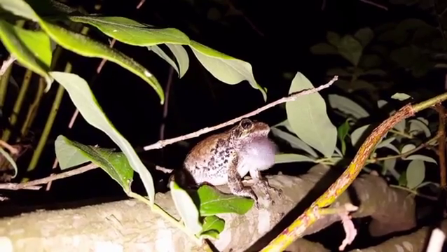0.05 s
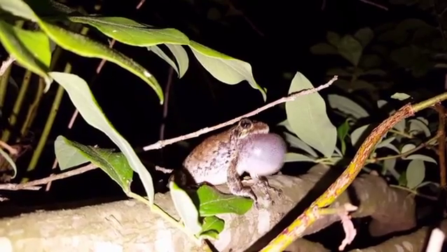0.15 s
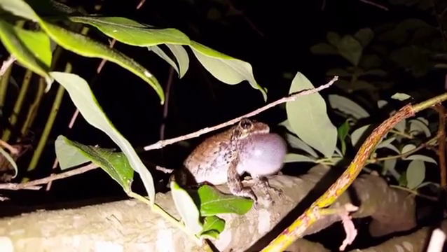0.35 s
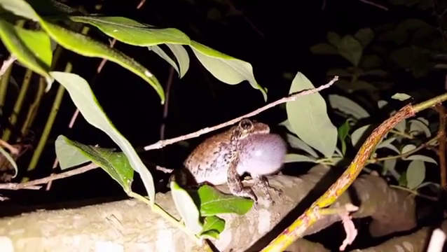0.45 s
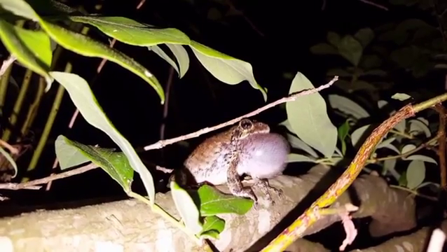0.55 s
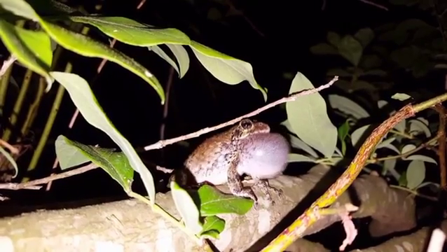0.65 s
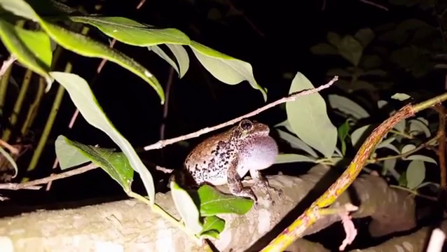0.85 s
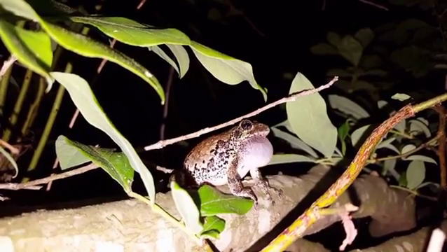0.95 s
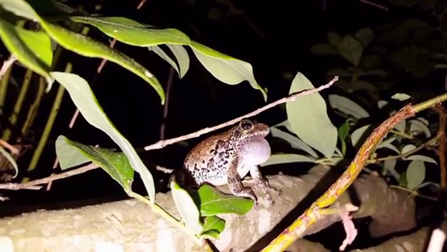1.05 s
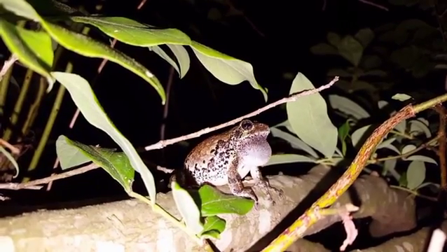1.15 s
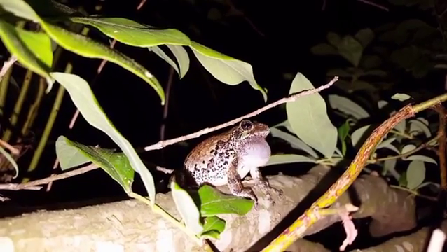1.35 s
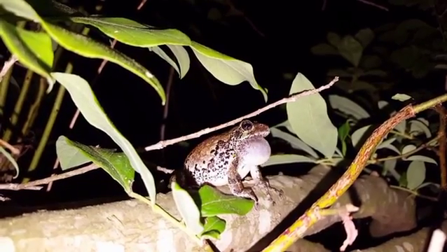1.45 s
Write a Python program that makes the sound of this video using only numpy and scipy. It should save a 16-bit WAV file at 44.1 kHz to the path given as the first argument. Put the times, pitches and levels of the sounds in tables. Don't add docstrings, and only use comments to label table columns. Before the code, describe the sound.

A tree frog's loud, close trill dominates from about 0.2 to 0.9 seconds: thirteen short, throaty, whistled pulses, roughly nineteen per second, each gliding upward around 2 kHz, with tiny leaf echoes. From 0.53 to 1.2 seconds a quieter frog trills on the right, slightly lower. Faint far frogs echo around a pond throughout, one joining near 0.95, over low rumble, hiss and a thin insect tone.

```python
import sys
import numpy as np
from scipy import signal
from scipy.fft import rfft, irfft
from scipy.io import wavfile

SR = 44100
rng = np.random.default_rng(int(sys.argv[2]) if len(sys.argv) > 2 else 0)


def field_ratio(decibels):
    return 10 ** (np.asarray(decibels, dtype=float) / 20)


def persist_wave(psi):
    counts = np.round(np.clip(psi, -1, 1) * 32767).astype(np.int16)
    wavfile.write(sys.argv[1], SR, np.atleast_2d(counts).T)


N = 66150
T = np.arange(N) / SR
LEFT_RIGHT = np.array([[.5], [-.5]])
MIDDLE_HZ = 999.5
WOBBLE_HZ = 220
POND_T60_S = 0.44


def read(points, hz):
    p = np.array(points)
    return np.interp(np.log(hz), np.log(p[:, 0]), p[:, 1])


def band(x, lo_hz, hi_hz):
    sos = signal.butter(2, [lo_hz, hi_hz], "band", fs=SR, output="sos")
    y = signal.sosfilt(sos, x)
    return y / np.sqrt(np.mean(y ** 2))


def walk(hz):
    return band(rng.standard_normal(N), hz / 4, hz)


def step(x):
    return np.sin(np.pi / 2 * np.clip(x, 0, 1)) ** 2


def scatter(x, t60_s, lag_s):
    t = T[:int(SR / 2)]
    tail = rng.standard_normal((2, len(t))) * field_ratio(-60 * t / t60_s) * step(t / lag_s)
    tail = tail / np.sqrt(np.sum(tail ** 2, axis=1, keepdims=True))
    return signal.fftconvolve(x[None], tail, axes=1)[:, :N]


def larynx(times, middle_hz, before_s, after_s):
    glide_hz_per_s, top_hz, pitch_jitter = 9200, 1155, .003
    attack_s, release_s = .0046, .0032
    k = np.searchsorted(times[1:] - before_s, T)
    u = T - times[k]
    glide = np.clip(1 + u * glide_hz_per_s / MIDDLE_HZ, .75, top_hz / MIDDLE_HZ)
    hz = glide * middle_hz * (1 + pitch_jitter * walk(300))
    phase = 2 * np.pi * np.cumsum(hz) / SR
    gate = step((u + before_s) / attack_s) * step((after_s[k] - u) / release_s)
    return k, u, hz, phase, gate


def far_frog(first_s, last_s, period_s, middle_hz, sac, before_s, after_s):
    beats = np.arange(40)
    chance = rng.standard_normal((len(beats), 2))
    times = first_s + period_s * beats + .0008 * chance[:, 0]
    k, u, hz, phase, gate = larynx(times, middle_hz, before_s, after_s + 0 * times)
    db = 1.2 * chance[k, 1] + 2.26 * walk(WOBBLE_HZ)
    partials = sum(field_ratio(db + read(sac, n * hz)) * np.sin(n * phase) for n in range(1, 5))
    return (times[k] < last_s) * gate * partials


def night():
    # [hz, db per Hz]
    rumble = [(25, -9), (60, -1), (130, -5), (200, -2), (350, -5), (500, -13), (1200, -24), (5000, -70)]
    rumble_db, hiss_db, hiss_hz = -70, -70, 2500
    insect_hz, insect_db = 3450, -88.5
    hz = np.maximum(np.arange(N // 2 + 1) * SR / N, 25)
    noise = rng.standard_normal(N) + 0.89 * rng.standard_normal((2, N))
    low = irfft(rfft(noise) * field_ratio(read(rumble, hz)), N) * field_ratio(2 * walk(6))
    hiss = irfft(rfft(rng.standard_normal((2, N))) / (1 + (hz / hiss_hz) ** 2.2), N)
    insect = band(noise, insect_hz - 120, insect_hz + 120) * field_ratio(2.6 * walk(30))
    low = field_ratio(rumble_db) * low / low.std()
    hiss = field_ratio(hiss_db) * hiss / hiss.std()
    return low + hiss + field_ratio(insect_db) * insect


def far_chorus():
    # [first_s, last_s, period_s, middle_hz]
    trills = [
        (-.03, 1.5, .043, 1000),
        (-.02, 1.3, .048, 960),
        (.0, 1.5, .056, 1020),
        (-.04, 1.5, .046, 975),
    ]
    # [first_s, last_s, period_s, middle_hz]
    late_trill = (.949, 1.5, .052, 1000)
    # [hz, level_db]
    far_sac = [(850, -11), (1020, -4), (1200, -12), (1750, -10), (2030, 7), (2300, -12), (2900, -24),
               (3800, -34)]
    chorus_db, late_db, pond_db, pan_db = -56, -50, 1.5, -2.5
    chorus = field_ratio(chorus_db) * sum(far_frog(*row, far_sac, .015, .017) for row in trills)
    chorus = chorus + field_ratio(late_db) * far_frog(*late_trill, far_sac, .011, .012)
    direct = np.array([np.roll(chorus, 9), chorus])
    return (direct + field_ratio(pond_db) * scatter(chorus, POND_T60_S, .02)) * field_ratio(pan_db * LEFT_RIGHT)


def tree_frog():
    # [middle_s, level_db, lapse_after_middle_ms, lapse_db, level_after_lapse_db]
    pulses = [(.2175, -5, 8, 0, -11), (.269, -1.2, 9.5, -1, -14), (.319, -2.5, 6, -1, -11),
              (.3725, -4, 6.5, -9, -1), (.425, -3.5, 2, -8, -2.5), (.479, -5, 9, -9, 1),
              (.5365, -3, 7, -1, -14), (.590, -6, 8.5, -8, -3), (.6455, -4, 8, -1, -13),
              (.701, -3.5, 14.5, -1, -6), (.755, -3.5, 15, -1, -10), (.810, -5, 7, -6, -7),
              (.8655, -4, 8, -1, -17)]
    # [level_db, loudest_hz, 6_db_down_below_hz, 6_db_down_above_hz]
    sac_partials = [(-15.5, 1090, 190, 200), (.5, 1038, 70, 135), (-27, 1040, 110, 150),
                    (-40, 1010, 80, 80), (-52, 1010, 80, 80)]
    # [left_minus_right_db, left_lead_rad]
    ports = [(1.5, 0.73), (-0.9, 0.77), (-1, 2.1), (1, 1.5)]
    before_s, after_s, linger_s_per_db = .017, .017, .0006
    lapse_s, fade_db_per_s, onset_wobble_db = .002, 1100, 6
    first_share = 0.52
    slack_db, slack_s, slack_widen = 6, .09, .6
    rasp_hz, rasp_width_hz, rasp_db, rasp_pan_db = 7800, 700, -48, -2
    air_db, hiss_db, croak_db = -52, -58, -30

    rows = np.array(pulses)
    linger_s = after_s - linger_s_per_db * rows[:, 4]
    k, u, hz, phase, gate = larynx(rows[:, 0], MIDDLE_HZ, before_s, linger_s)
    pulse_db = rows[k, 1]
    late = (u - rows[k, 2] / 1000) / lapse_s
    effort_db = rows[k, 3] * np.exp(-late ** 2) + rows[k, 4] * step(late / 3 + .5)
    drift_db = onset_wobble_db * step((-u - .005) / .006) * np.tanh(walk(130) - .4)
    drift_db = drift_db - fade_db_per_s * np.maximum(u - .013, 0)
    slack = np.exp(-np.abs(T - rows[0, 0]) / slack_s)

    voice = 0
    for n, (top_db, top_hz, below_hz, above_hz) in enumerate(sac_partials, 1):
        lr_db, lead = ports[min(n, len(ports)) - 1]
        width_hz = np.where(hz < top_hz, below_hz * (1 + slack_widen * slack), above_hz)
        off = (hz - top_hz) / width_hz
        db = top_db - 15 * (np.sqrt(1 + .96 * off ** 2) - 1) + pulse_db + drift_db
        db += (.4 if n < 3 else 3.5) * walk(WOBBLE_HZ)
        db += (first_share if n == 1 else 1) * effort_db
        if n != 2:
            db += slack_db * slack
        voice = voice + field_ratio(db + lr_db * LEFT_RIGHT) * np.sin(n * phase + lead * LEFT_RIGHT)

    push_db = pulse_db + .5 * effort_db + drift_db - 6 * (u / .014) ** 2 + 3 * walk(90)
    push = field_ratio(push_db) * (1 + 0.59 * np.sin(phase))
    noise = rng.standard_normal(N) + 1.1 * rng.standard_normal((2, N))
    rasp = band(noise, rasp_hz - rasp_width_hz / 2, rasp_hz + rasp_width_hz / 2)
    rasp = field_ratio(rasp_db + rasp_pan_db * LEFT_RIGHT) * rasp
    rasp = rasp + field_ratio(air_db) * band(noise, 2600, 6000) + field_ratio(hiss_db) * band(noise, 12000, 13000)
    croak = field_ratio(croak_db + slack_db * slack + pulse_db - 6 * ((u + .012) / .005) ** 2)
    croak = croak * band(rng.standard_normal(N), 950, 2200)
    return (voice + rasp * push + croak) * gate


def leaves(frog):
    return field_ratio(-17) * scatter(frog.mean(0), .06, .005)


def neighbour():
    # [first_s, last_s, period_s, middle_hz]
    trill = (.5308, 1.2, .0469, 900)
    # [hz, level_db]
    neighbour_sac = [(850, -17), (1000, -13), (1650, -9), (1780, 0), (1950, -7), (2100, -18), (2850, -20),
                     (3600, -38)]
    level_db, pan_db, lag_samples, wet_db = -36, -10, 12, -14
    frog = field_ratio(level_db) * far_frog(*trill, neighbour_sac, .008, .011)
    direct = np.array([np.roll(frog, lag_samples), frog]) * field_ratio(pan_db * LEFT_RIGHT)
    return direct + field_ratio(wet_db) * scatter(frog, POND_T60_S, .01)


def scene():
    duck_db, night_duck_db, duck_from_s, duck_s, late_db_per_s = 3.5, 4, 0.24, .08, -4.5
    wide = np.exp(-np.maximum(T - duck_from_s, 0) / duck_s)
    gain_db = duck_db * wide + late_db_per_s * (T - 1.3)
    background = field_ratio(gain_db) * (far_chorus() + field_ratio(night_duck_db * wide) * night())
    frog = tree_frog()
    return frog + leaves(frog) + neighbour() + background


def band_limit(x):
    return signal.sosfilt(signal.butter(12, 15670, fs=SR, output="sos"), x)


def record(dry):
    # [left_db, right_db]
    lopsided_db = [-42, -29]
    clip = 1.02
    soft = dry / (1 + np.abs(dry / clip) ** 8) ** (1 / 8)
    mix = soft + field_ratio(np.array(lopsided_db))[:, None] * soft ** 8
    return band_limit(mix)


dry = scene()
out = record(dry)
persist_wave(out)
```